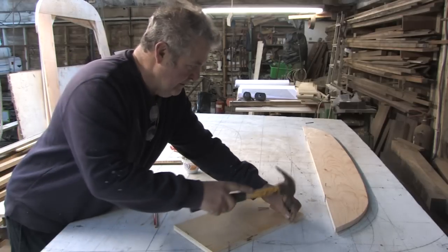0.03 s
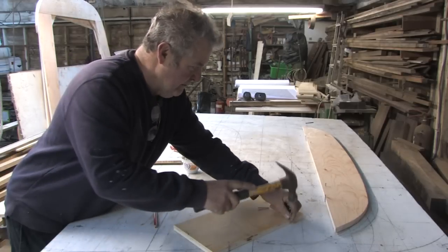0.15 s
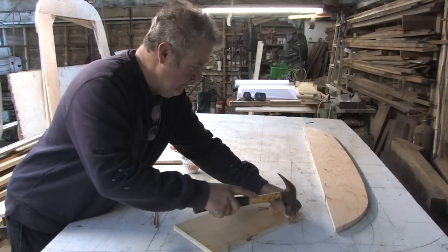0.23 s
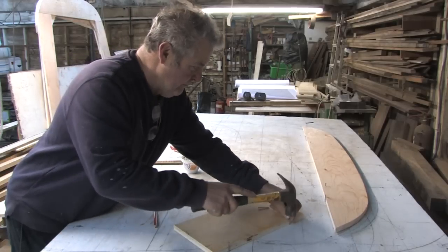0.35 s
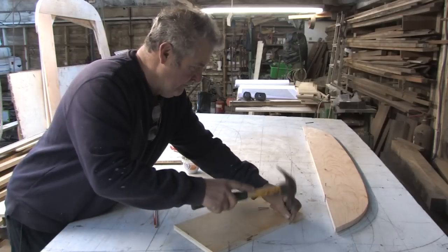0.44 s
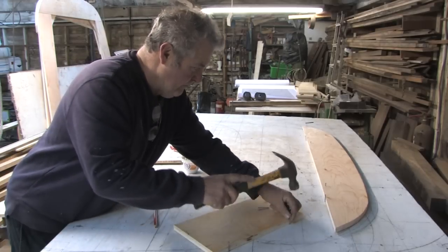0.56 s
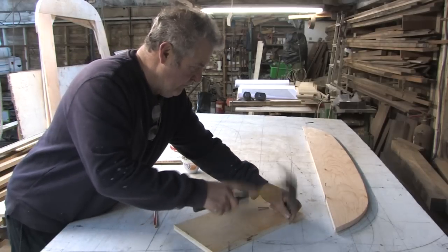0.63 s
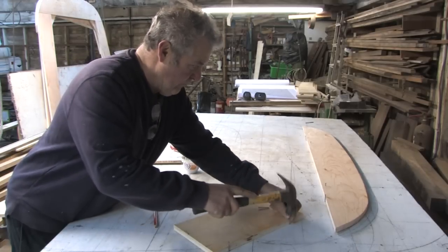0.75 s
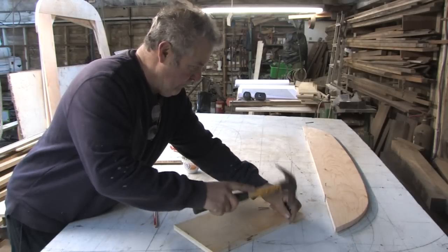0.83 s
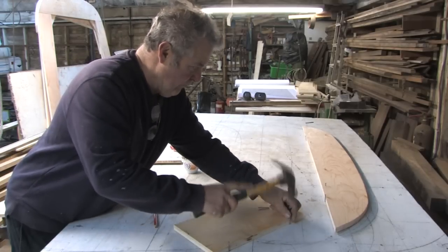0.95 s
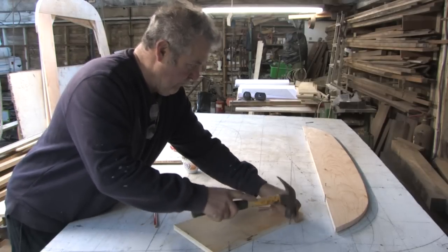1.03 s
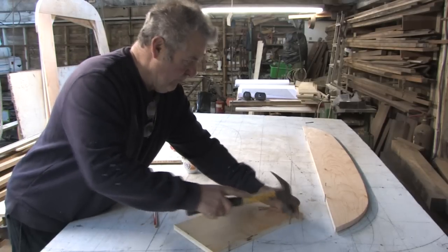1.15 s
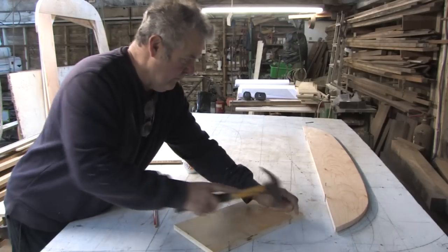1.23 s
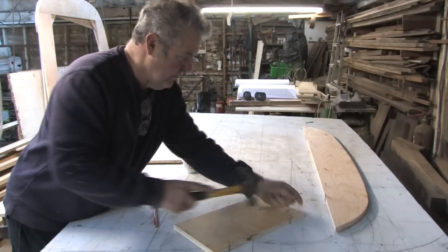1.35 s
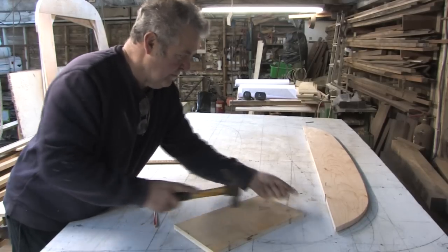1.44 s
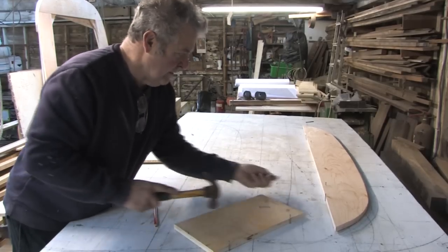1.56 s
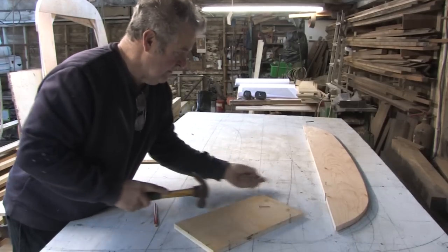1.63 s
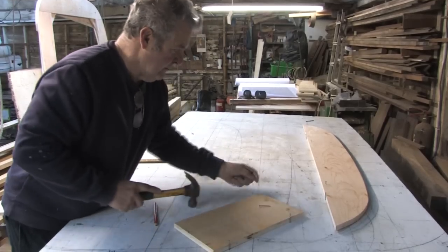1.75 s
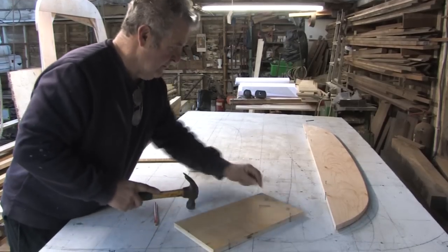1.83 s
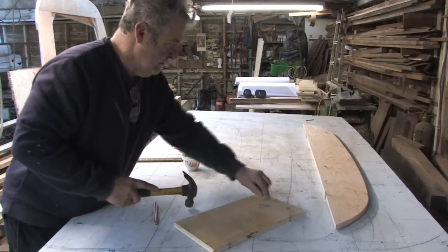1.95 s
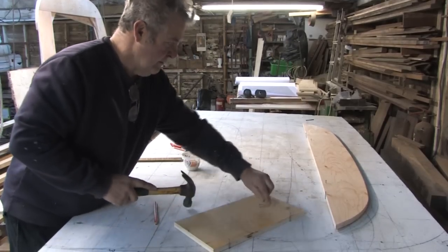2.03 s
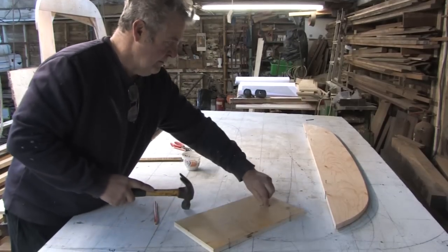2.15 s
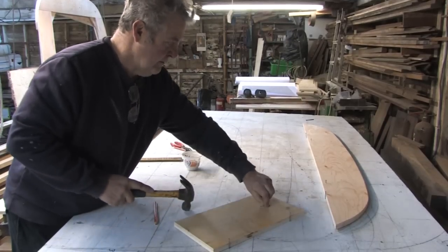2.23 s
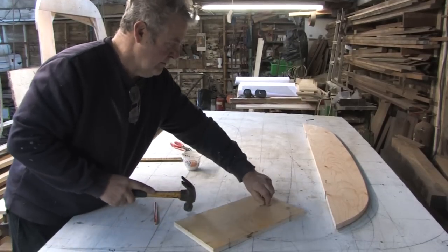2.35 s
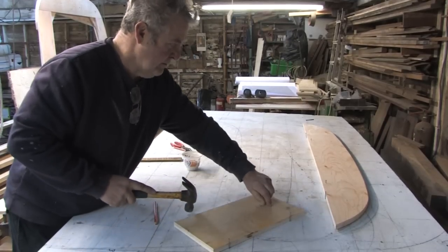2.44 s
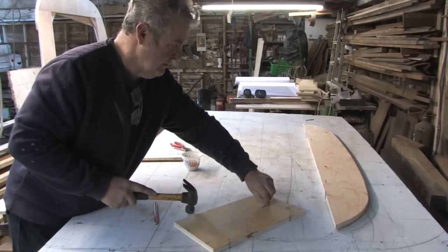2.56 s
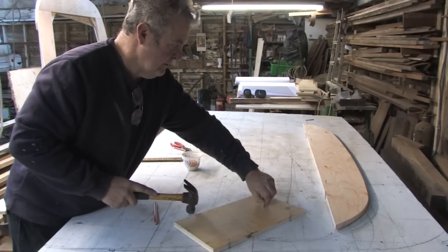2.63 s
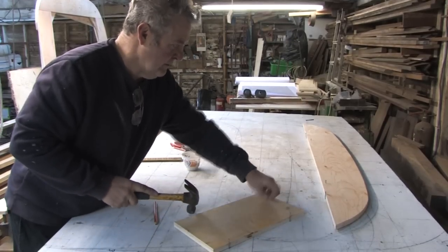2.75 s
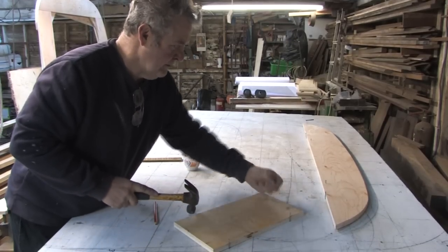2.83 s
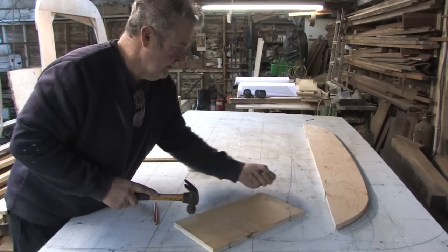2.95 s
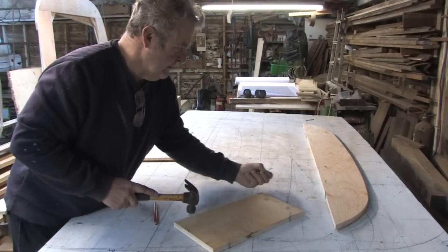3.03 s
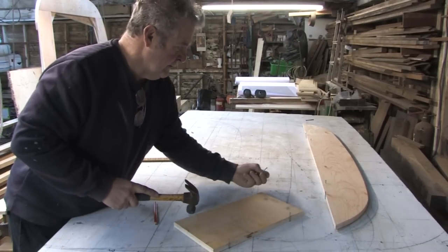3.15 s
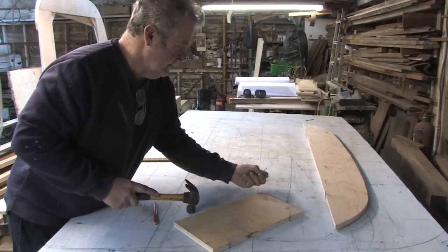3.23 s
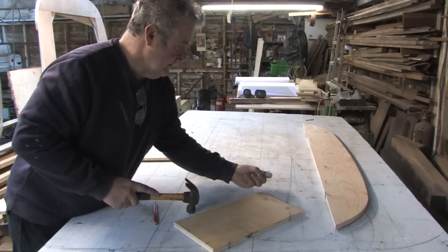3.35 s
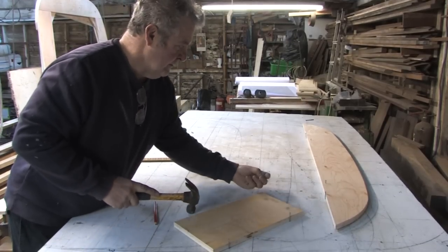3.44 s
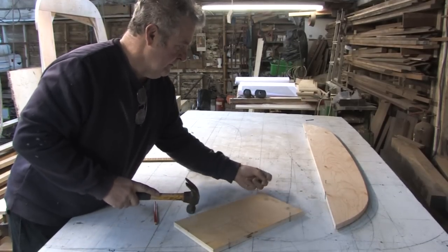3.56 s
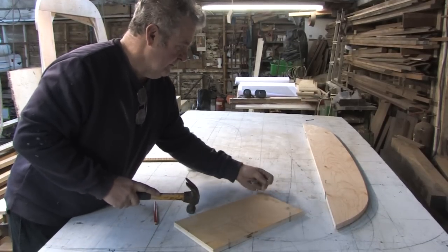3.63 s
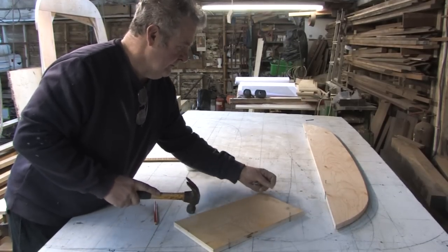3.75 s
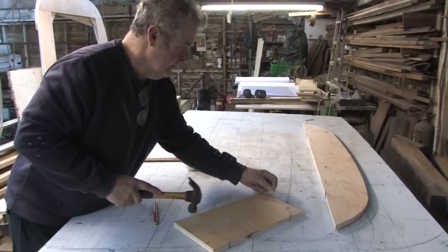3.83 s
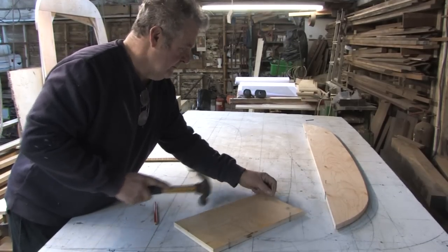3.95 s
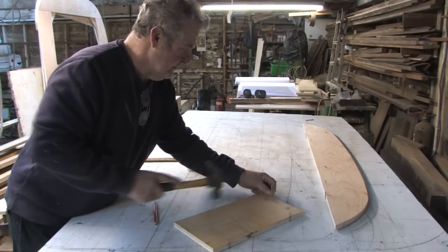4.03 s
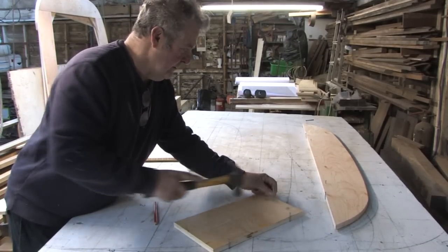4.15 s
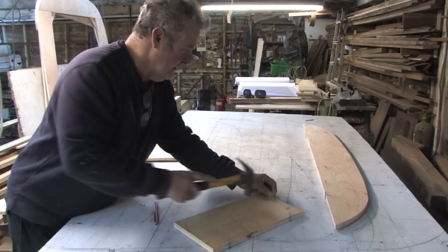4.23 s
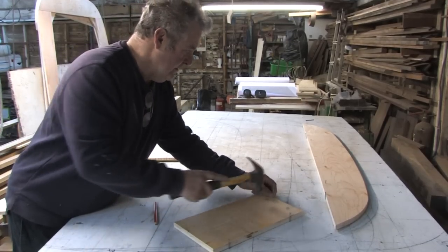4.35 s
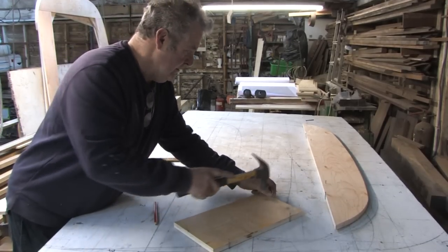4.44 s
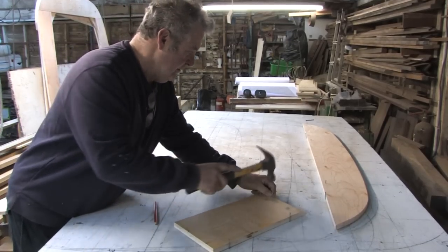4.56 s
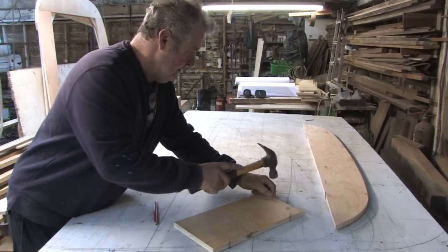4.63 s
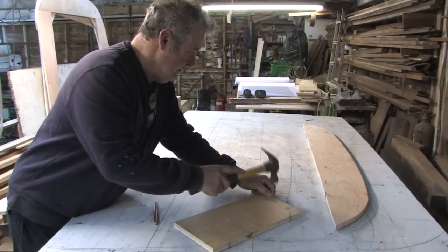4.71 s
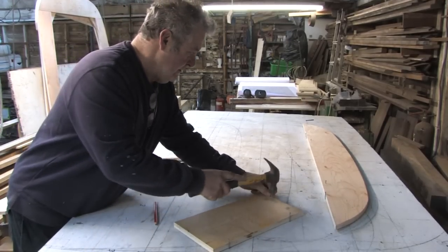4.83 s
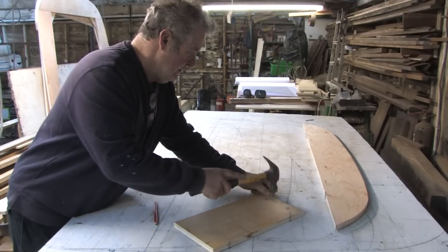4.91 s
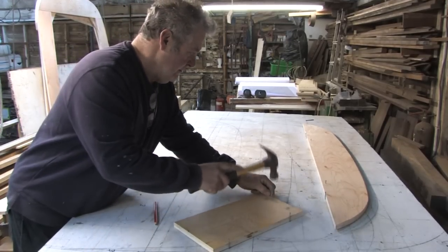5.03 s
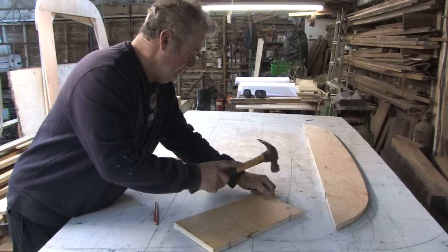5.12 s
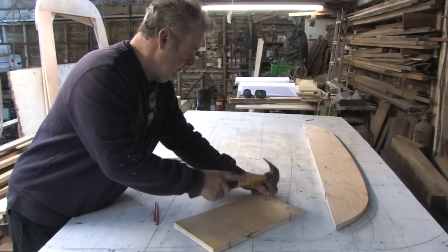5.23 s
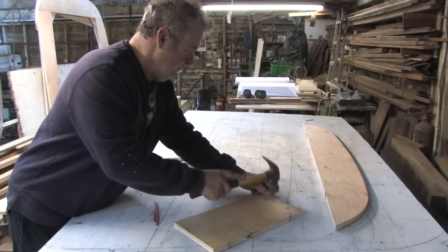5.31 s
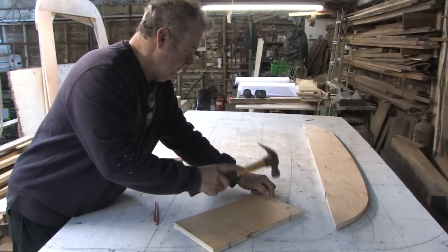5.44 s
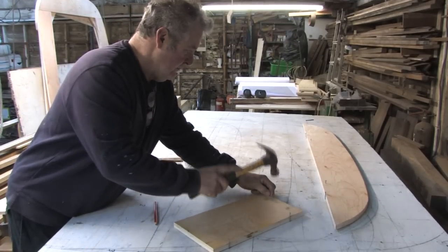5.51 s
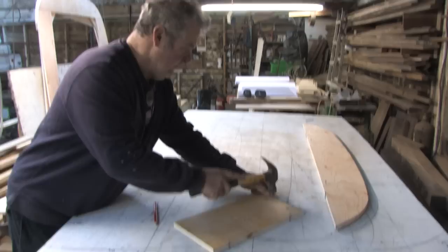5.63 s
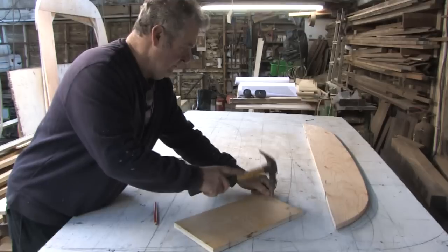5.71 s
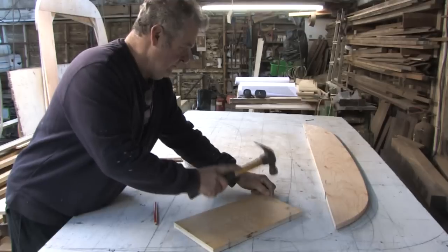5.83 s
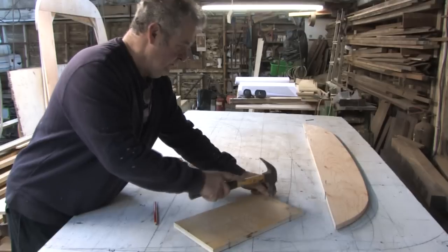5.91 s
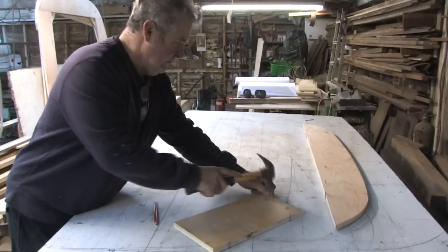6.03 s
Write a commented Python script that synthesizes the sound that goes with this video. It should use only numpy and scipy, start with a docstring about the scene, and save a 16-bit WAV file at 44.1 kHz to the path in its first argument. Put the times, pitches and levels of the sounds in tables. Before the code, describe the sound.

In a timber shed with low rumble and faint hiss, a hammer drives a nail into plywood on a large hollow bench. Blows land at about 0.3, 0.75 and 1.1 s, each a brief steel ping, dry wood crack and hollow low boom, with rattling loose bits and a dark echo; a knock follows the first as the board bounces. From 1.3 s the hand rubs and swishes away, with faint nail clinks near 1.7, a thud at 1.9, then ticks, scratches and a softer thud at 2.6. Small nails tinkle around 2.8 to 3.2. A sharp knock comes at 3.6, then rubbing, clinks and a tick by 4.05, and light nail-point scratching until 4.8. Hammering resumes at 4.9 with a short bright tap and a booming bench, then heavier blows at 5.3, 5.65 and 6.0 s, the last cut off at the end.

```python
"""In a timber workshop a hammer drives nails into a plywood board lying on a large hollow bench.
Each blow is a steel ping, a crack of shaped noise, a boom of dying sines, a chatter and a late shed echo.
Between blows a hand sets things down (thuds, ticks), clinks nails (dying sines), drags a nail point
and swishes a sleeve (noise under a pressure curve). Low rumble and faint hiss fill the air."""
import sys
import numpy as np
from scipy import signal
from scipy.io import wavfile
from scipy.ndimage import uniform_filter1d

SR = 44100
rng = np.random.default_rng(int(sys.argv[2]) if len(sys.argv) > 2 else 0)


def linear_from_db(decibels):
    """Turn decibels (scalar or array-like) into linear amplitude factors; 0 gives 1."""
    return 10 ** (np.asarray(decibels, float) / 20)


def bounce(signal):
    """Save signal as a 16-bit WAV file at the path given by the first command-line argument."""
    frames = np.transpose(np.atleast_2d(signal))
    limited = np.clip(frames, -1, 1)
    pcm = np.round(limited * 32767).astype(np.int16)
    wavfile.write(sys.argv[1], SR, pcm)


N = 268128  # length in samples

# All levels in spectrum tables are relative, per Hz. t60_s is the time to fall by 60 dB.
# rumble and hiss of the shed: pitch_hz, level_db
AIR_SPECTRUM = [(20, -16), (33, 0), (50, -2.5), (66, -4), (110, -5.5), (175, -3.5), (240, -13),
                (330, -13.5), (620, -19.5), (1180, -31), (2200, -43), (4500, -45.5), (7000, -56),
                (10000, -61.5), (14700, -67), (16500, -84)]
AIR_DB = -32
# thin airy swishes of hand and sleeve: start_s, length_s, level_db
SWISHES = [(1.33, .13, -58), (2.2, 0.022, -55), (2.42, 0.081, -62), (2.55, 0.051, -60)]
# colour of a swish: pitch_hz, level_db
SWISH_SPECTRUM = [(2500, -15), (5000, 2), (8000, 0), (13000, -12), (16000, -12)]
# the nail point nicking the wood: start_s, level_db
NICKS = [(2.36, -44.5), (2.372, -47), (2.385, -36), (2.5827, -49), (3.994, -39), (4.0702, -35),
         (4.079, -48), (4.177, -49), (4.186, -47), (4.2317, -49.5), (4.408, -56), (4.433, -47),
         (4.474, -40), (4.515, -47), (4.585, -42), (4.6647, -43)]
NICK_PEAK_S = 0.002
# strokes of rubbing on wood: start_s, length_s, nail_point_db, hand_and_hammer_db
RUBS = [(1.3, 0.15, -55, -40), (1.6, 0.9, -69, -59), (2.18, .1, -56, -55), (2.35, 0.047, -53, -48.5),
        (2.41, 0.12, -54.5, -53.5), (2.55, 0.099, -46, -45), (2.68, 0.062, -59, -53), (3.76, .07, -77, -44),
        (3.81, 0.099, -74, -34), (3.89, 0.11, -72, -46), (3.97, 0.084, -66, -44.5), (4.38, 0.3, -50.5, -65),
        (4.5, 0.07, -51, -44), (4.66, .08, -67, -54), (4.82, 0.13, -51.5, -54)]
# colour of the nail point on wood: pitch_hz, level_db
POINT_SPECTRUM = [(1500, -29), (2700, -9), (3500, 3.5), (4250, -5.5), (5100, -3), (6200, -20), (7800, -23),
                  (11500, -34), (16000, -45)]
# colour of hand and hammer on wood: pitch_hz, level_db
BROAD_SPECTRUM = [(350, -18), (800, 5), (1600, 2.5), (2800, -8.5), (4500, -17), (8000, -39), (16000, -52)]
STROKE_SKEW, STROKE_POWER = 0.82, 0.49  # shape of the pressure arch over each stroke
# nails touching each other: start_s, level_db, upper_modes_db (the two upper modes, different for each clink)
CLINKS = [(1.6611, -45, -12), (1.6934, -44, -5), (2.8145, -46, -16), (2.8713, -42.5, -28),
          (2.9153, -39, -7), (2.9836, -52, -30), (3.0006, -53, -25), (3.0123, -43, -15),
          (3.1424, -42.5, -14), (3.1822, -48, -6), (3.5209, -48, -28), (3.603, -44, -28),
          (3.9794, -46, -10), (4.0088, -36, -20), (4.03, -43, -20), (4.0494, -45, -6), (4.692, -60, -6)]
# modes of a loose nail, before small random shifts: pitch_hz, level_db, t60_s
NAIL_MODES = [(6680, -10.5, 0.15), (10100, -21, .03), (14500, -12, 0.058)]
# small knocks and ticks of wood and tools: start_s, level_db, centre_hz
TICKS = [(0.2051, -23.5, 1540), (0.22, -44, 1710), (0.3694, -12.5, 1640), (1.9229, -15, 1480),
         (2.1612, -24, 1940), (2.2079, -38, 2600), (2.235, -41, 2460), (2.385, -30, 2400),
         (2.5827, -27, 1540), (2.6159, -29.5, 1960), (3.6013, -7, 2130), (3.65, -15, 2000),
         (3.7825, -33, 1750), (4.0482, -11.5, 1700), (4.9167, -39, 1670), (4.9343, -18.5, 1560),
         (5.3604, -9, 1560)]
TICK_HZ, TICK_OCTAVES = 1600, 1  # a tick centred here has this width; higher ticks are narrower
TICK_T60_S = 0.15  # of the scatter after the snap
SCATTER_DB, SCATTER_DULL = -13.5, 0.71  # scatter against its snap: level, and centre as a fraction
# the loudest hops of loose nails after a blow: start_s, level_db
HOPS = [(0.3596, -32), (0.3774, -35), (0.4554, -40), (0.773, -49), (0.8589, -32.5), (1.1294, -37),
        (1.2022, -46), (4.9224, -31), (5.3504, -14.5), (5.3914, -28), (5.696, -27), (5.7703, -34)]
# a nail still standing tall rings under its first tap: start_s, level_db, pitch_hz, t60_s
NAIL_RINGS = [(4.8916, -7, 5300, .009)]
# softer thuds as the board bounces or things are set down: start_s, boom_db, thump_db, knock_db
THUDS = [(0.368, -20.5, -13, -19.5), (1.921, -17, -7.5, -16.5), (2.615, -18.5, -14.5, -30),
         (4.005, -44, -43, -29), (5.358, -25, -13, -18)]
# where the boom, thump and knock levels apply: pitch_hz
THUD_HZ = [100, 180, 450]
# modes of board and bench, before weighting and random shifts: pitch_hz, level_db, t60_s
BENCH_MODES = [(85, -54, 0.1), (104.3, 3, 0.27), (125.6, -2, 0.3), (156.6, 2, 0.22), (175, 9, 0.094),
               (205.4, -8, 0.34), (229.1, 3.5, 0.16), (259, -23, 0.058), (320, -1, 0.27), (367.3, -3, 0.21),
               (442.6, -3, 0.23), (477, -9, 0.26), (555, -3, 0.14), (625.4, -17.5, 0.19),
               (771, -5.5, 0.067), (1020, -2, 0.085), (1120, -8.5, 0.017), (1300, -3, 0.059)]
# hammer blows: start_s, steel_ping_db, bench_boom_db, board_thump_db, shed_echo_db
BLOWS = [(0.3105, -11.5, -12, -5.5, -37), (0.7424, -7.5, -13.5, -9.5, -20.5),
         (1.0925, -7.5, -12.5, -8.5, -20), (4.8914, -16.5, -6.5, -14, -42), (5.3189, -14, -6, 1.5, -22.5),
         (5.6641, -8.5, -9, -4.5, -18.5), (5.9839, -8, -6.5, -5, -18.5)]
# hammer on nail head, before small random shifts: pitch_hz, level_db, t60_s
STEEL_MODES = [(3370, 17, 0.0019), (5690, -15, 0.042), (7520, 6, 0.0037), (10670, -22, 0.0083),
               (13400, -19, 0.0024)]
# colour of the crack: pitch_hz, level_db
CRACK_SPECTRUM = [(410, -24), (700, -2), (1340, -6), (1770, -10), (2240, -11), (7170, -21.5),
                  (15000, -37.5), (16500, -40)]
# how the crack lingers; air and timber swallow the treble first: pitch_hz, t60_s
CRACK_DECAY = [(2000, 0.32), (5000, 0.2), (9000, 0.15), (15000, .16)]
CRACK_S, CRACK_TREBLE_S = 0.021, 0.0083  # the crack lasts longer in its body than in its treble
CRACK_SPLIT_HZ = 4200
KNOCK_DB, KNOCK_SLOPE = -11, 0.33  # the upper wood modes grow a little with the sharpness of the blow
# colour of the loose things: pitch_hz, level_db
CHATTER_SPECTRUM = [(1500, -6), (3000, 3), (5000, 0.5), (6800, 3), (9000, -5), (15000, -24)]
# colour of the shed's tail before its slow swell, 0.15 s after the blow: pitch_hz, level_db
ECHO_SPECTRUM = [(53, -38), (95, 0.5), (185, -6), (230, -9.5), (600, -13), (1300, -21), (3000, -32.5),
                 (4800, -41), (7000, -53), (16000, -98)]
# how the shed's tail dies: pitch_hz, t60_s
SHED_DECAY = [(60, 0.7), (200, 0.75), (600, 0.82), (1500, 1.08), (3000, 0.78), (6000, 0.47), (12000, 1.05)]
EDGE_HZ = 16300  # upper band limit


def evened(x):
    """Scales to rms 1."""
    return x / np.sqrt(np.mean(x ** 2) + 1e-20)


def read(points, hz):
    """Reads a table on a log-frequency axis."""
    f, value = np.transpose(points)
    return np.interp(np.log(hz + 1), np.log(f + 1), value)


def add(mix, start_s, sound):
    """Mixes a sound in at a time."""
    part = mix[round(start_s * SR):][:len(sound)]
    part += sound[:len(part)]


def noise(length, field_db, size=256):
    """Noise from random short-time spectra whose level is field_db(Hz, s)."""
    frames = 4 * length // size + 5
    hz = np.fft.rfftfreq(size, 1 / SR)[:, None]
    seconds = np.arange(frames) * size / 4 / SR
    real, imaginary = rng.standard_normal((frames, len(hz), 2)).T
    spectra = (real + 1j * imaginary) * linear_from_db(field_db(hz, seconds))
    return signal.istft(spectra, nperseg=size, noverlap=3 * size // 4)[1][:length]


def coloured(points, length):
    """Steady noise with a given spectrum, rms 1."""
    return evened(noise(length, lambda hz, s: read(points, hz) + 0 * s))


def wobble(length, size):
    """Smooth random curve, rms 1; size is the smoothing window in samples."""
    return evened(signal.oaconvolve(rng.standard_normal(length), signal.windows.hann(size), "same"))


def ring(modes, t, extra_db):
    """Sum of dying sines, one for each way the object can vibrate."""
    out = 0
    for (hz, db, t60), extra in zip(modes, extra_db):
        out = out + linear_from_db(db + extra - 60 * t / t60) * np.sin(2 * np.pi * hz * t)
    return out


def hiss_round(centre_hz, octaves, length):
    """Noise in a smooth band, about 6 dB down the given octaves from its centre; rms 1."""
    width = np.clip(octaves, 0.2, 3)
    return evened(noise(length, lambda hz, s: -6 * (np.log2((hz + 50) / centre_hz) / width) ** 2 + 0 * s))


def snap(db, hz, octaves, t60):
    """A burst of hiss round a centre with a quieter, duller, longer scatter."""
    t = np.arange(SR // 6) / SR
    sharp = hiss_round(hz, octaves, len(t)) * linear_from_db(-60 * t / 0.006)
    dull = hiss_round(SCATTER_DULL * hz, octaves, len(t))
    scatter = dull * linear_from_db(SCATTER_DB - 60 * t / np.clip(t60, 0.01, 1))
    onset = 1 - np.exp(-(t / 0.00041) ** 2)
    return linear_from_db(db) * onset * (sharp + scatter)


def arch(length_s):
    """Pressure over one stroke: it rises and falls once."""
    progress = np.arange(0, length_s, 1 / SR) / length_s
    return abs(np.sin(np.pi * progress ** STROKE_SKEW)) ** STROKE_POWER


def air():
    """Low distant rumble and faint hiss, slightly patchy in pitch and time."""
    def field_db(hz, s):
        across_pitch = uniform_filter1d(rng.standard_normal((len(hz), len(s))), 9, 0)
        patches = uniform_filter1d(across_pitch, 12, 1)
        return read(AIR_SPECTRUM, hz) + 1.9 * evened(patches)
    return linear_from_db(AIR_DB) * evened(noise(N, field_db, size=2048))


def swish(length_s, db):
    """A soft wisp of bright noise from moving cloth."""
    pressure = arch(length_s)
    return linear_from_db(db) * pressure * coloured(SWISH_SPECTRUM, len(pressure))


def nick(db):
    """A few milliseconds of the nail point's own colour, quickly up and more slowly down."""
    t = np.arange(SR // 20) / SR
    swell = t / NICK_PEAK_S * np.exp(1 - t / NICK_PEAK_S)
    return linear_from_db(db) * coloured(POINT_SPECTRUM, len(t)) * swell


def rub(length_s, point_db, broad_db):
    """Grainy friction noise of a bright nail point and of a dull broad contact; each catches and slips."""
    pressure = arch(length_s)
    length = len(pressure)
    out = np.zeros(length)
    for db, spectrum, catch_db in ((point_db, POINT_SPECTRUM, 5.5), (broad_db, BROAD_SPECTRUM, 3)):
        catching = linear_from_db(catch_db * wobble(length, size=500))
        out += linear_from_db(db) * evened(catching * coloured(spectrum, length))
    return pressure * out


def clink(db, high_db):
    """Bending modes of a steel nail rattling against others, with a tiny click."""
    t = np.arange(SR // 8) / SR
    click = linear_from_db(-8 - 60 * t / 0.004) * np.diff(rng.standard_normal(len(t) + 1))
    rattle = 1 + 0.98 * wobble(len(t), size=120)
    shifted = t * rng.uniform(0.993, 1.007)  # pitch differs a little from clink to clink
    return linear_from_db(db) * (rattle * ring(NAIL_MODES, shifted, (0, high_db, high_db)) + click)


def tick(db, hz):
    """A dry snap of wood or tool round its centre, then a short scatter."""
    octaves = TICK_OCTAVES * TICK_HZ / (hz + TICK_HZ) * 2
    return snap(db, hz, octaves, TICK_T60_S)


def hop(db):
    """A loose nail landing: a bright, very short snap."""
    return snap(db, 8700, 0.42, 0.02)


def nail_ring(db, hz, t60):
    """One short bright mode of a standing nail."""
    return ring([(hz, db, t60)], np.arange(SR // 10) / SR, [0])


def thud(boom_db, thump_db, knock_db):
    """Board and bench ringing; bending waves carry the treble first, so low modes start later."""
    t = np.arange(SR // 2) / SR
    out = np.zeros(len(t))
    levels = list(zip(THUD_HZ, (boom_db, thump_db, knock_db)))
    weights = read(levels, np.transpose(BENCH_MODES)[0])
    for (hz, db, t60), weight in zip(BENCH_MODES, weights):
        pitch_shift, level_shift = rng.standard_normal(2)
        loose = min(hz / 600, 1)  # upper modes shift with where the blow lands
        mode = (hz * (1 + 0.048 * loose * pitch_shift), db + 3 * loose * level_shift, t60)
        later = np.maximum(t - 0.32 / hz, 0)
        onset = 1 - np.exp(-later * hz / 0.71)
        out += ring([mode], later, [weight]) * onset
    rough = wobble(len(t), size=200)  # slow random roughness in the loudness of the ringing
    return out * (1 + 0.31 * rough)


def steel_ping(db, t):
    """Hammer meeting nail head: a tiny burst of hiss and the short modes of steel."""
    hiss = linear_from_db(db - 7.5 - 60 * t / 0.0086) * rng.standard_normal(len(t))
    modes = ring(STEEL_MODES, t * rng.uniform(0.86, 1.033), np.zeros(len(STEEL_MODES)))
    return hiss + linear_from_db(db) * modes * (1 - np.exp(-t / 0.00058))


def crack(echo_db, t):
    """Wood cracking: a noise burst with shorter treble, then an unsteady lingering part."""
    burst = coloured(CRACK_SPECTRUM, len(t))
    body = signal.lfilter(*signal.butter(2, CRACK_SPLIT_HZ, fs=SR), burst)
    treble = burst - body
    out = body * np.exp(-(t / CRACK_S) ** 2) + treble * np.exp(-(t / CRACK_TREBLE_S) ** 2)
    linger = noise(len(t), lambda hz, s: read(CRACK_SPECTRUM, hz) - 60 * s / read(CRACK_DECAY, hz))
    linger /= np.std(linger[:SR // 40])
    out += linear_from_db(-5.5 + 3.4 * wobble(len(t), size=300)) * linger
    onset = 1 - np.exp(-(t / 0.00067) ** 2)
    return linear_from_db(0.51 * echo_db - 3.5) * out * onset  # a hard blow both cracks and fills the shed


def chatter(thump_db, t):
    """The jumping board shakes what lies on it: random hops, about 150 a second, shape bright noise."""
    hits = (rng.random(len(t)) < 150 / SR) * linear_from_db(3 * rng.standard_normal(len(t)))
    hops = signal.lfilter([1], [1, -np.exp(-1 / (0.001 * SR))], hits) + 0.49  # each dies in about 1 ms
    swell = np.exp(-(t / 0.13) ** 2) * (1 - np.exp(-(t / 0.021) ** 2))
    return linear_from_db(thump_db - 35.5) * coloured(CHATTER_SPECTRUM, len(t)) * hops * swell


def shed_echo(db, t):
    """The shed's tail: noise that dies at its own rate at each pitch; the far walls answer late."""
    def field_db(hz, s):
        return read(ECHO_SPECTRUM, hz) - 60 * (s - 0.15) / read(SHED_DECAY, hz)
    tail = noise(len(t), field_db, size=512)
    tail /= np.std(tail[SR // 10:SR // 5])
    return linear_from_db(db) * tail * (1 - np.exp(-(t / 0.096) ** 2))


def blow(ping_db, boom_db, thump_db, echo_db):
    """Steel pings, wood cracks and booms a moment later, loose things chatter and the shed rings on."""
    t = np.arange(SR) / SR
    out = steel_ping(ping_db, t) + crack(echo_db, t)
    add(out, 0.0015, thud(boom_db, thump_db, KNOCK_DB + KNOCK_SLOPE * ping_db))
    return out + chatter(thump_db, t) + shed_echo(echo_db, t)


def scene():
    """All sounds at one microphone."""
    mix = air()
    for rows, source in ((SWISHES, swish), (NICKS, nick), (RUBS, rub), (CLINKS, clink), (TICKS, tick),
                         (HOPS, hop), (NAIL_RINGS, nail_ring), (THUDS, thud), (BLOWS, blow)):
        for start_s, *settings in rows:
            add(mix, start_s, source(*settings))
    return mix[None]


def roll_off(x):
    """The treble ends steeply here."""
    return signal.sosfilt(signal.butter(12, 16810, fs=SR, output="sos"), x)


def record(dry):
    """The loudest peaks bend at a knee near full scale; then the top of the band is cut off."""
    knee = 7  # higher is a sharper bend
    bent = dry / (1 + abs(dry) ** knee) ** (1 / knee)
    edge = signal.firwin(101, EDGE_HZ, fs=SR)[None]
    finished = signal.oaconvolve(bent, edge, "same")
    return roll_off(finished)


dry = scene()
out = record(dry)
bounce(out)
```